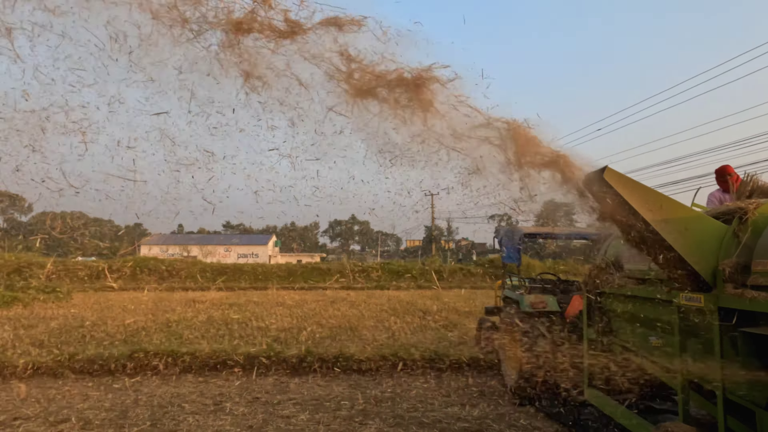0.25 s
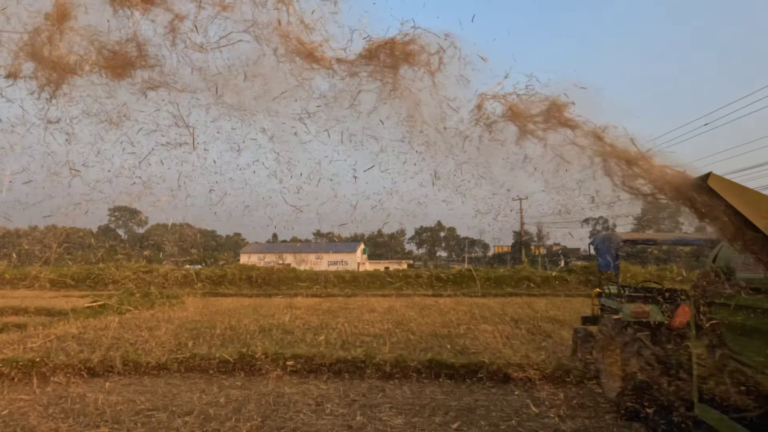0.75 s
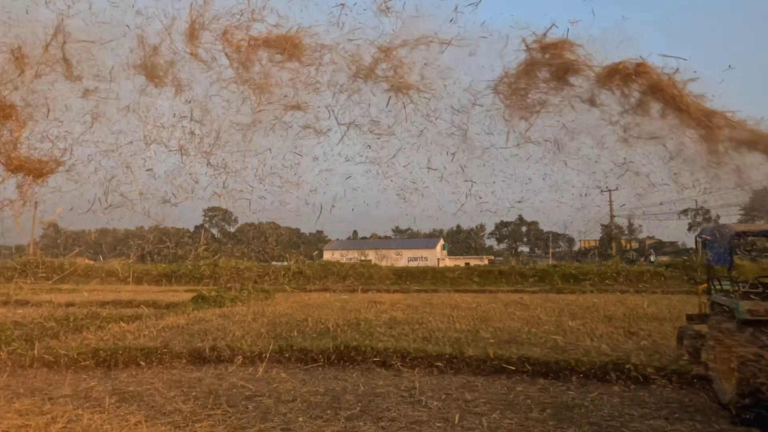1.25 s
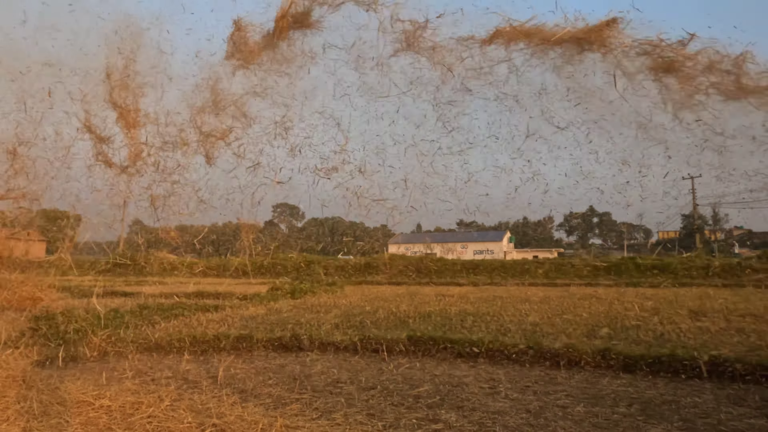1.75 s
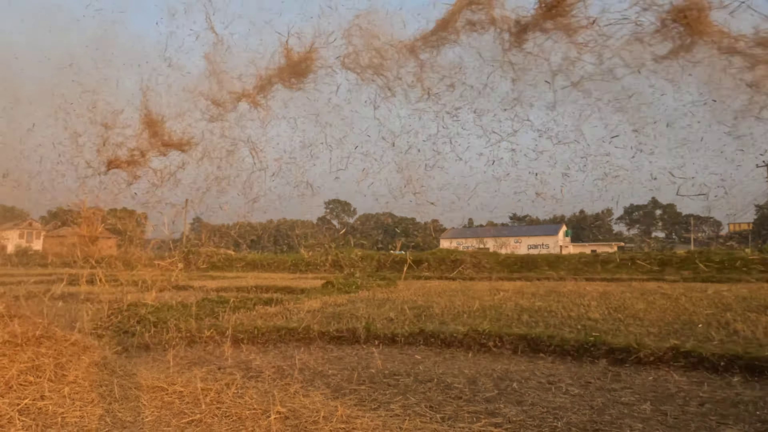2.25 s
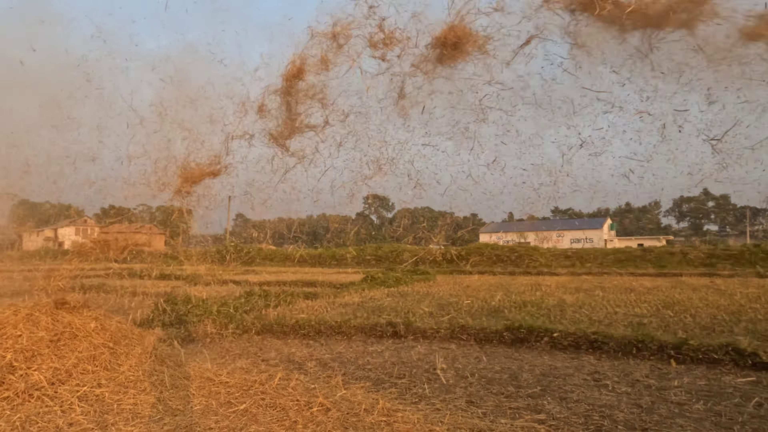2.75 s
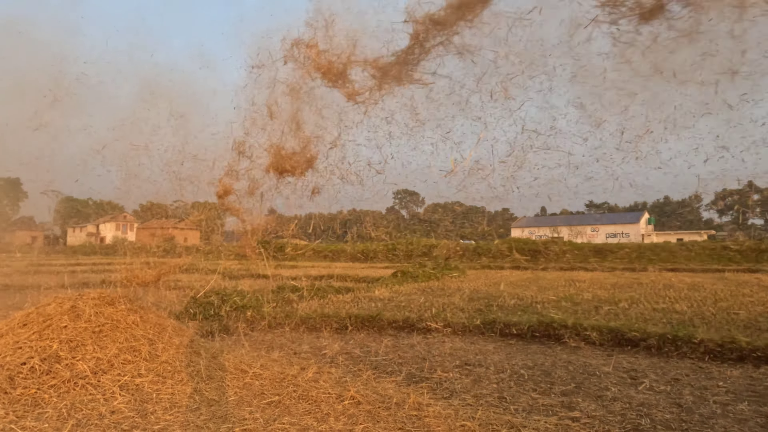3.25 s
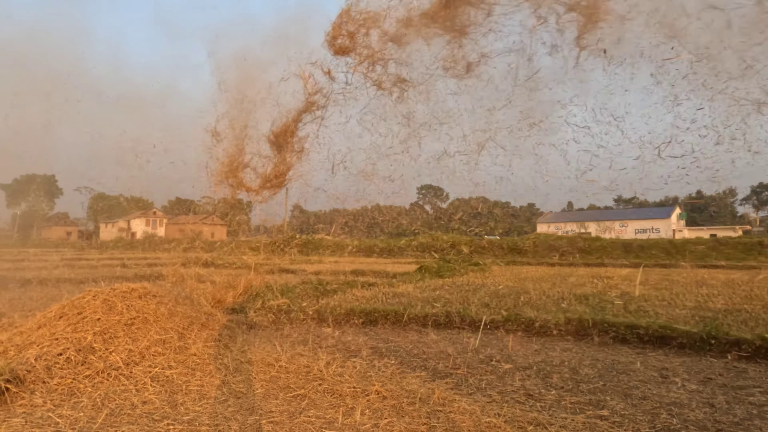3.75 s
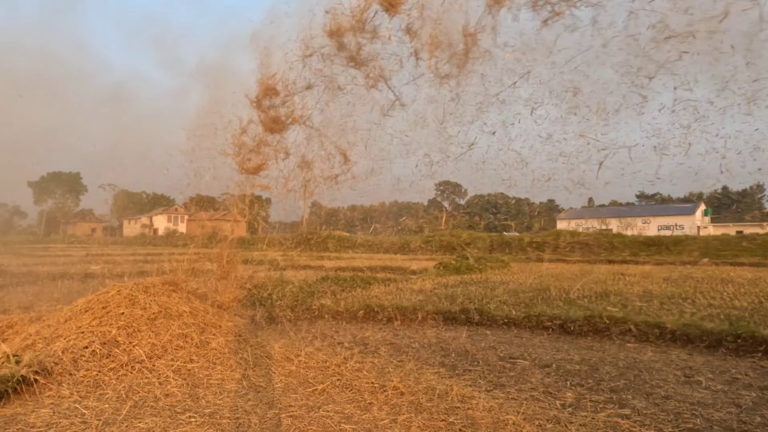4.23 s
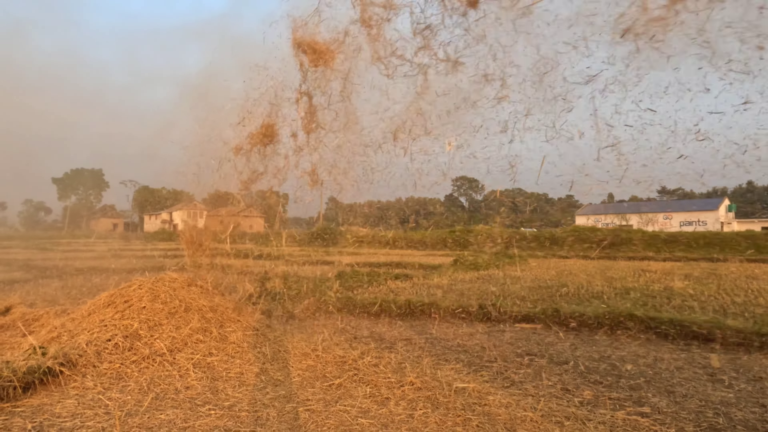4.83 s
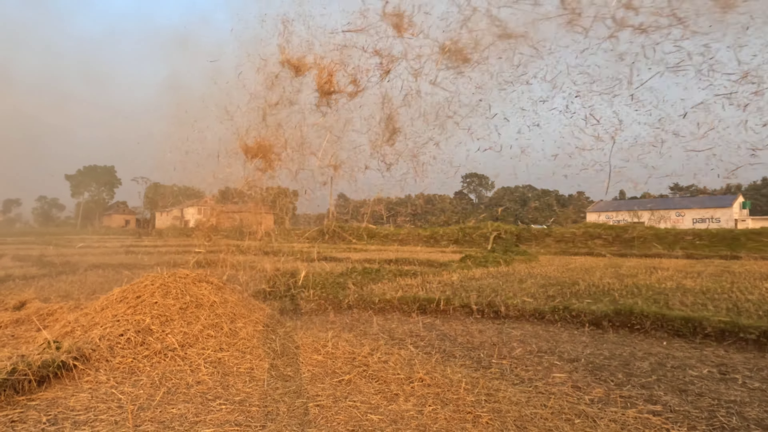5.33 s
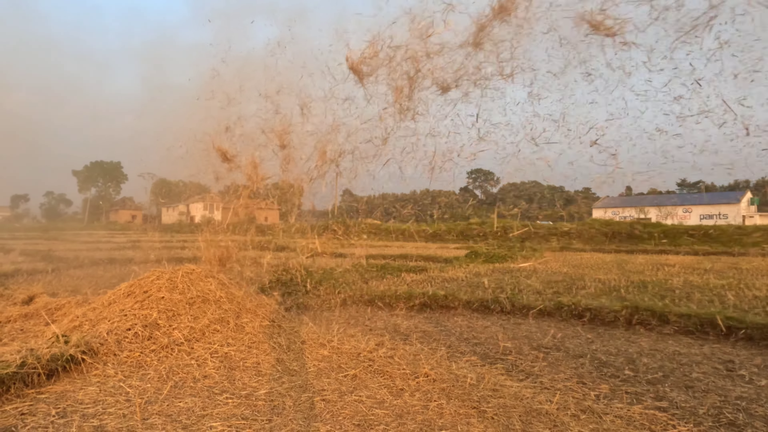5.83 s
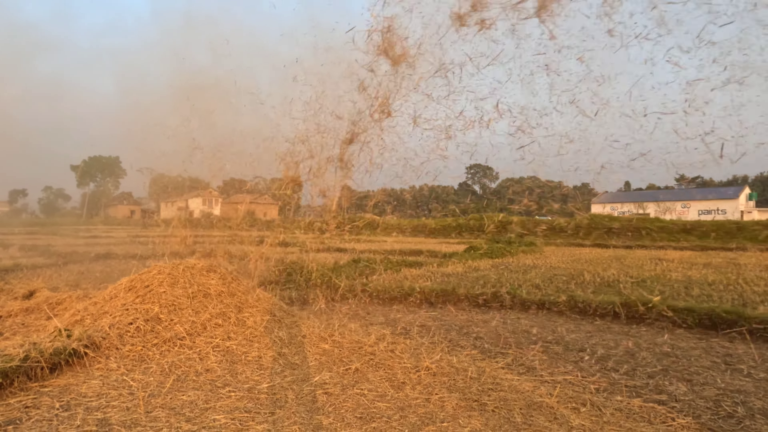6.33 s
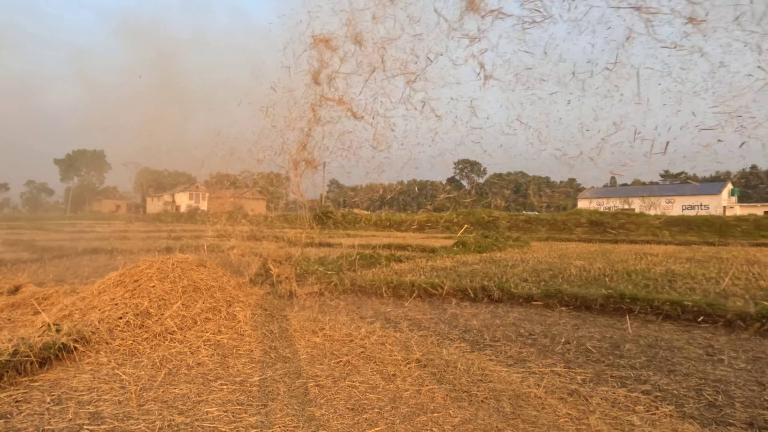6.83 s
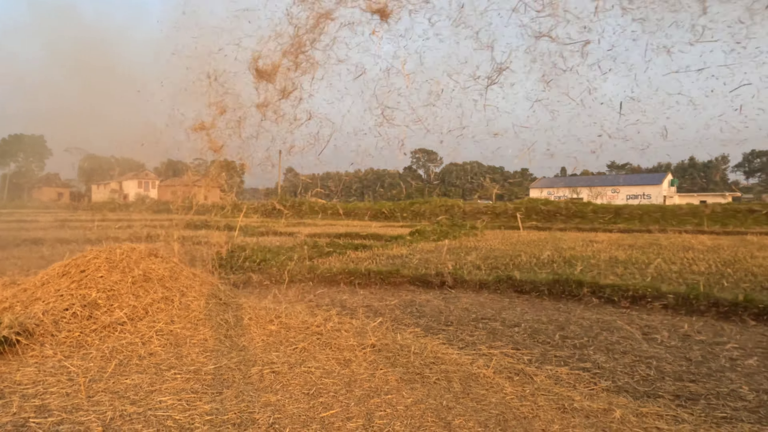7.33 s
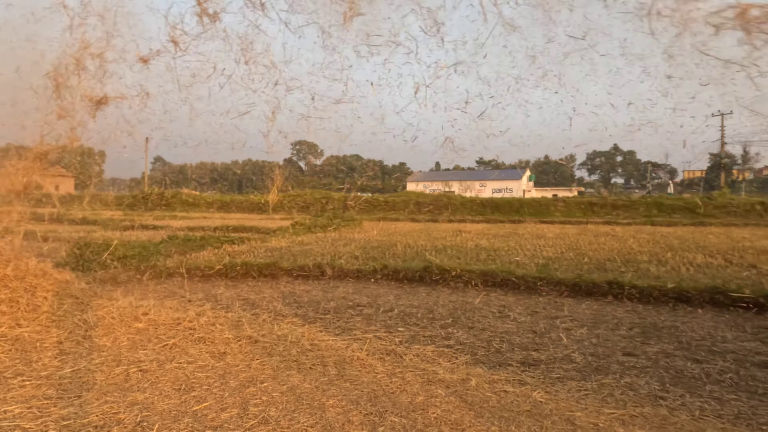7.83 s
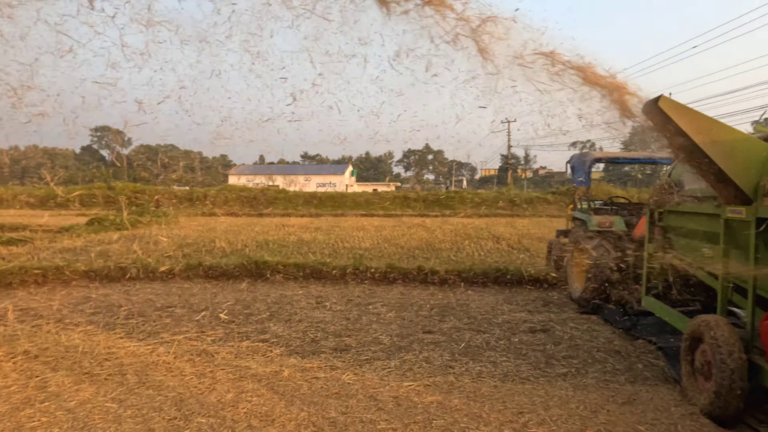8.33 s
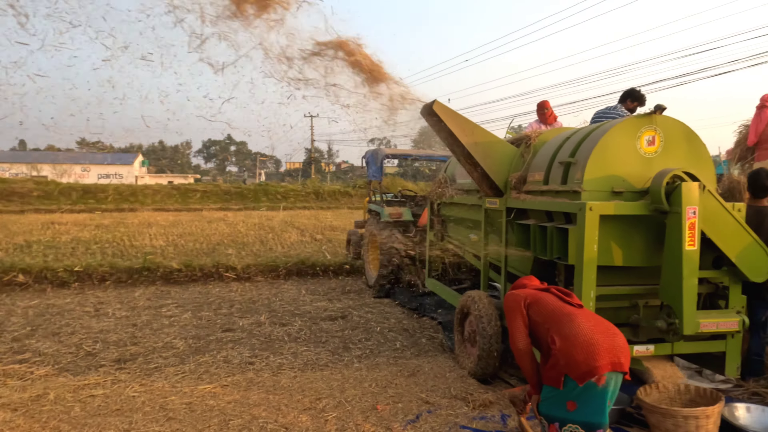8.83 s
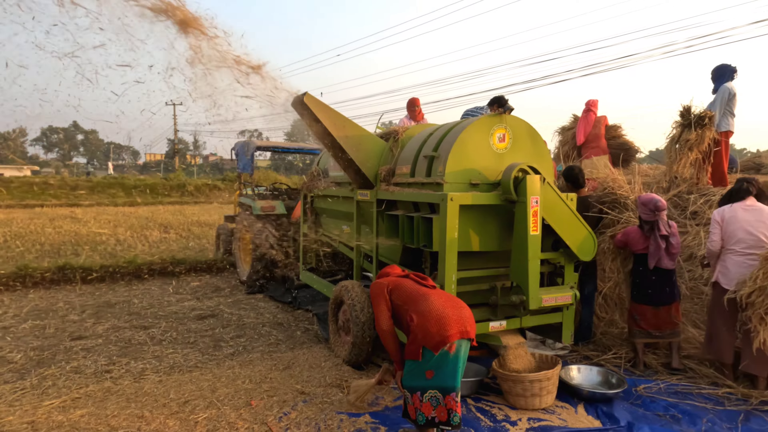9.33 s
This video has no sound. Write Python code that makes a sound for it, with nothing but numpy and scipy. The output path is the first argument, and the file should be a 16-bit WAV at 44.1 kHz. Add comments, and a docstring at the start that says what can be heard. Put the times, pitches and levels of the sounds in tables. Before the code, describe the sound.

Continuous deep fluttering drone of a threshing machine with rushing air, straw hiss and fine metallic rattle; one tiny rising squeak near four seconds.

```python
"""A paddy thresher driven by a tractor, heard from a few metres in an open field. Throughout, the four-blade blower
throbs as locked cosines, the geared engine fires slightly slower, shaped noise makes the housing roar and straw hiss,
and struck modes make the sheet metal rattle. A two-port microphone starts with the machine beside it and turns away
by 2.2 s; a short metal squeak glides up at 3.8 s; from 7.7 s the ports turn back and end up facing the machine."""
import sys
import numpy as np
from scipy import signal
from scipy.fft import rfft, irfft, next_fast_len
from scipy.io import wavfile
from scipy.ndimage import uniform_filter1d, map_coordinates

SR = 44100
rng = np.random.default_rng(int(sys.argv[2]) if len(sys.argv) > 2 else 0)


def output_pcm(signal):
    """Save a mono or channel-first signal as 16-bit PCM at the path in sys.argv[1].

    Samples are clipped to [-1, 1] before scaling.
    """
    pcm = np.clip(np.atleast_2d(signal).T, -1, 1) * 32767
    wavfile.write(sys.argv[1], SR, np.round(pcm).astype(np.int16))


N = 422037  # samples

# All source levels below are ahead of the port response.
# Blower speed. Each row: time in seconds, blade passes in Hz.
BLOWER_SPEED = [(0, 39.08), (.8, 38.99), (1.45, 38.53), (1.9, 38.57), (2.5, 38.79), (3.0, 39.15),
                (4.4, 39.72), (5.0, 39.74), (5.35, 39.42), (5.9, 39.25), (6.6, 39.4), (8.0, 39.95),
                (8.3, 39.87), (8.9, 39.12), (9.57, 39.02)]
# Blower partials; quarters come from unequal blades. Each row: multiple of the blade pass, rms in dB, waver in dB.
BLADE_PARTIALS = [(1, -20, 1.5), (1.25, -50, 5), (1.75, -44, 3), (2, -15, 0.2), (2.499, -52, 2.5),
                  (3, -29, 0.5), (4, -55, 0), (5, -38, 2), (6, -51, 2), (7, -36, 0.5), (8, -47.5, 1),
                  (9, -39, 3), (10, -51, 3)]
# Engine partials. Each row: multiple of the firing rate, rms in dB, waver in dB.
ENGINE_PARTIALS = [(1, -42, 2), (2, -37.5, 1.5), (3, -34.5, 1), (4, -37, .5), (5, -43, .5), (6, -48.5, 1),
                   (8, -47, .5)]
# Airstream. Each row: time in seconds, roar in dB within 300-1500 Hz, straw hiss in dB within 2.5-9 kHz.
AIR_LEVELS = [(0, -26, -34.5), (.3, -27, -36), (1.7, -27.5, -36), (3.3, -27.5, -37.5), (4.0, -27.5, -37.5),
              (4.9, -27, -36.5), (5.9, -28, -36.5), (6.2, -26.5, -37), (6.45, -28, -37.5),
              (7.1, -27.5, -37), (8.15, -28.8, -37), (8.35, -28.5, -36), (8.6, -29, -38), (9.05, -26, -36),
              (9.57, -27.5, -36.3)]
# Clumps of straw leaving the chute. Each row: time in seconds, peak rise of the hiss in dB.
STRAW_CLUMPS = [(.624, 3), (.86, 3), (3.707, 4.5), (4.163, 2.5), (4.51, 4.5), (4.62, 3.5), (4.87, 2.5),
                (5.22, 1.5), (5.692, 1), (6.204, 3), (6.69, 3.5), (7.13, 2.5), (8.19, 0.5)]
# Roar spectrum. Each row: frequency in Hz, relative density in dB.
ROAR_SPECTRUM = [(15, -24), (25, 2), (60, 6.5), (100, 3.5), (150, -1.5), (250, -0.5), (400, 0), (560, -1),
                 (680, -5.5), (1000, -6), (1250, -8.5), (1350, -9), (1480, -16), (2200, -21.5), (4000, -51)]
# Hiss spectrum. Each row: frequency in Hz, relative density in dB.
HISS_SPECTRUM = [(880, -27), (1500, -1.5), (1900, -5), (2350, -7.5), (3180, -8.5), (4180, -11), (5500, -9),
                 (6700, -9.5), (7500, -8.5), (8100, -12.5), (8800, -16), (10100, -23.5), (12200, -21.5),
                 (13600, -33), (15500, -49)]
# Modes of the sheet-metal housing. Each row: frequency in Hz, relative strength in dB, t60 in seconds.
HOUSING_MODES = [(427, 0, 0.058), (549.5, -1, 0.1), (652, -5, 0.051), (786, -1, 0.024), (949, -1, 0.058),
                 (1038, -10.5, 0.097), (1142, -3.5, 0.12), (1240, -2.5, 0.09), (1597, -9, 0.046),
                 (1983, -5.5, 0.049)]
# Timed knocks on the housing. Each row: time in seconds, blow strength in dB ahead of a random draw per mode.
TIMED_KNOCKS = [(.234, -22.5), (.523, -31), (.667, -27), (.958, -31), (4.575, -29), (6.012, -24),
                (6.078, -33), (6.539, -35), (8.76, -35), (8.834, -24), (9.154, -35), (9.254, -27)]
# Turn of the ports. Each row: time in seconds, heading (0 turned away, 1 machine beside, 2 machine ahead).
HEADING = [(0, 1.04), (.85, 0.66), (1.6, 0.15), (2.2, 0.021), (7.7, 0.06), (8.1, 0.67), (8.3, 0.8),
           (8.55, 1), (8.8, 1.7), (9.1, 1.9), (9.57, 2.3)]
# Port pair turned away. Each row: frequency in Hz, left-right likeness 0-1, left over right in dB,
# left phase lead in radians, colour in dB.
PORTS_AWAY = [(80, .9995, 0.04, -0.029, -0.5), (200, .998, -0.6, -0.012, -0.5), (400, 1, 0.2, -0.17, 0),
              (1000, 0.85, -2, -0.31, 0), (2200, 0.93, -1.5, -1.06, 0), (3000, .55, -4.4, -1.66, 0),
              (3800, 0.48, -7.5, -.8, 0), (6000, 0.89, -0.5, 0.22, 0.5), (9000, 0.92, 0, -.03, 0),
              (10500, 0.3, 3.5, .06, 0), (12500, .33, 3, .25, -0.5)]
# Port pair with the machine beside. Each row: frequency in Hz, left-right likeness 0-1, left over right in dB,
# left phase lead in radians, colour in dB.
PORTS_BESIDE = [(80, 0.98, 0, -.02, -0.2), (250, 1, -.6, -.1, 3), (402, 0.94, -1.5, -0.32, -0.5),
                (600, .93, -3.5, -0.43, 0.5), (1000, .94, -2.5, -0.27, 3), (2180, 0.61, -4, -.83, 0.9),
                (3000, .67, -4.6, -1, 5), (4700, .66, -4.5, -.45, 4.5), (8500, 0.87, -1, .03, 4),
                (10500, .28, 1, .23, 4), (12500, .38, 2, .3, 4)]
# Port pair with the machine ahead. Each row: frequency in Hz, left-right likeness 0-1, left over right in dB,
# left phase lead in radians, colour in dB.
PORTS_AHEAD = [(80, .9995, 0, -0.014, -0.4), (245, .989, -.3, -0.064, -0.5), (400, 0.91, -3, -.16, -6.5),
               (600, 0.98, .3, -.05, 1), (1100, 0.87, -0.5, -.28, -2), (2200, 0.96, -0.5, -.27, 3),
               (3800, .82, 1, -.4, 5.5), (6000, 0.71, 1.4, -.55, 3.5), (9000, .9, 0, -.1, 4.5),
               (10500, .6, 3.8, -.06, 6), (13000, .25, 1, 0, 2)]

FIRINGS_PER_PASS = .923
SWELL_DB, SWELLS_PER_S = 0.28, 5  # uneven feeding of sheaves
CLUMP_S = 0.023
SQUEAK_START_S, SQUEAK_LENGTH_S, SQUEAK_PEAK_DB = 3.79, .095, -28
SQUEAK_FROM_HZ, SQUEAK_TO_HZ = 905, 1012
BASS_HZ, TOP_HZ = 40, 15620


def amp(db):
    """Decibels to gain."""
    return 10 ** (np.asarray(db) / 20)


def along(points, hz):
    """Interpolate (Hz, value) points on a log axis."""
    f, v = np.transpose(points)
    return np.interp(np.log(hz + 1), np.log(f + 1), v)


def curves(rows):
    """One value per sample for each column after the time."""
    s, *cols = np.transpose(rows)
    return [np.interp(np.arange(N) / SR, s, c) for c in cols]


def wobble(knots_per_s):
    """Smooth random curve through normal random knots."""
    knots = rng.standard_normal(int(N * knots_per_s / SR) + 4)
    return map_coordinates(knots, [np.arange(N) * knots_per_s / SR])


def filtered(x, response):
    """x times a complex response of frequency; mirrored ends keep the edges free of clicks."""
    edge = 4096  # samples
    x = np.concatenate([x[..., edge:0:-1], x, x[..., :-edge:-1]], axis=-1)
    m = next_fast_len(x.shape[-1])
    spectrum = rfft(x, m) * response(np.fft.rfftfreq(m, 1 / SR))
    return irfft(spectrum, m)[..., edge:edge + N]


def hum(cycles, partials):
    """Pulse train as locked cosines, each wavering a little; upper multiples lag more."""
    lag_cycles = .0015  # per squared multiple
    out = np.zeros(N)
    for k, rms_db, waver_db in partials:
        level = np.sqrt(2) * amp(rms_db + waver_db * wobble(6))
        out += level * np.cos(2 * np.pi * k * (cycles - lag_cycles * k))
    return out


def shafts():
    """Blower and engine share one drive, so their hums sag and recover together; the belt slips a little."""
    pass_hz, = curves(BLOWER_SPEED)
    passes = np.cumsum(pass_hz) / SR - .36  # first pulse about a third of a pass in
    slip_cycles = .03 * wobble(.7)
    firings = FIRINGS_PER_PASS * passes + slip_cycles + 0.2886
    return hum(passes, BLADE_PARTIALS) + hum(firings, ENGINE_PARTIALS)


def rush(spectrum, band_hz, patchy_db):
    """Two unrelated noises with shared patches of random gain, scaled by the first to rms 1 in the band."""
    z = signal.stft(rng.standard_normal((2, N + 1024)), nperseg=512)[2]
    patches = rng.standard_normal(z.shape[1:])
    patches = uniform_filter1d(patches, size=8, axis=0)  # across frequency
    patches = uniform_filter1d(patches, size=10, axis=1)  # across time
    z = z * amp(patchy_db * patches / patches.std())
    pair = signal.istft(z, nperseg=512)[1][:, 512:N + 512]
    pair = filtered(pair, lambda hz: amp(along(spectrum, hz)))
    in_band = filtered(pair[0], lambda hz: (hz > band_hz[0]) & (hz < band_hz[1]))
    return pair / in_band.std()


def airstream():
    """Roar of the housing and hiss of the straw, both fluttering with the uneven feed."""
    t, feed = np.arange(N) / SR, wobble(14)
    roar_db, hiss_db = (db + SWELL_DB * wobble(SWELLS_PER_S) for db in curves(AIR_LEVELS))
    # a clump starts quickly and thins out
    for s, rise_db in STRAW_CLUMPS:
        u = np.clip((t - s) / CLUMP_S + 0.45, 0, None) * 3
        hiss_db = hiss_db + rise_db * u * np.exp(1 - u)
    roar_db = roar_db + .3 * feed + .3 * wobble(30)
    hiss_db = hiss_db + .5 * feed + .4 * wobble(40)
    roar = amp(roar_db) * rush(ROAR_SPECTRUM, (300, 1500), patchy_db=.8)
    hiss = amp(hiss_db) * rush(HISS_SPECTRUM, (2500, 9000), patchy_db=.7)
    return roar + hiss


def rattle(blows_per_s, db, spread_db):
    """Sheaves and grain strike the housing; each blow rings its modes at new strengths."""
    count = int(blows_per_s * N / SR)
    knock_s, knock_db = np.transpose(TIMED_KNOCKS)
    times_s = np.r_[rng.uniform(0, N / SR, count), knock_s]
    blows_db = np.r_[db + spread_db * rng.standard_normal(count), knock_db]
    t, out = np.arange(SR // 10) / SR, np.zeros(N)
    for hz, mode_db, t60_s in HOUSING_MODES:
        strengths = amp(blows_db + mode_db) * rng.standard_normal(len(times_s))
        blows = np.bincount((times_s * SR).astype(int), strengths, N)
        envelope = amp(-60 * t / t60_s) * (1 - np.exp(-t / 0.0021))
        out += signal.fftconvolve(blows, envelope * np.sin(2 * np.pi * hz * t))[:N]
    return out


def squeak():
    """Squeak of metal: one rising partial that swells past its middle and dies."""
    u = np.clip((np.arange(N) / SR - SQUEAK_START_S) / SQUEAK_LENGTH_S, 0, 1)
    hz = SQUEAK_FROM_HZ + (SQUEAK_TO_HZ - SQUEAK_FROM_HZ) * u
    swell = np.sin(np.pi * u ** 1.3)
    return amp(SQUEAK_PEAK_DB) * swell * np.sin(2 * np.pi * np.cumsum(hz) / SR)


def ports(pair, table):
    """Left and right port: a shared and a diffuse part, with the shadow and delay of the body between them."""
    alike, balance, lead, colour = ([(row[0], row[k]) for row in table] for k in range(1, 5))
    sign = np.array([[1], [-1]])  # left, right

    def mix(hz):
        # cos^2 - sin^2 of this angle is the likeness
        angle = np.arccos(np.clip(along(alike, hz), 0, 1)) / 2
        return np.array([np.cos(angle), np.sin(angle)])

    def body(hz):
        gain_db = along(colour, hz) + sign * along(balance, hz) / 2
        return amp(gain_db) * np.exp(.5j * sign * along(lead, hz))

    shared, diffuse = filtered(pair, mix)
    return filtered(shared + sign * diffuse, body)


def scene():
    """The machine as heard while the ports turn: neighbouring headings cross-fade."""
    machine = shafts() + rattle(blows_per_s=140, db=-38, spread_db=2.5) + squeak()
    pair = airstream() + machine * [[1], [0]]  # machine in the shared part only
    heading = np.clip(curves(HEADING)[0], 0, 2)
    out = np.zeros((2, N))
    for k, table in enumerate([PORTS_AWAY, PORTS_BESIDE, PORTS_AHEAD]):
        out += np.clip(1 - abs(heading - k), 0, 1) * ports(pair, table)
    return out


def record(dry):
    """Microphones roll off the deep bass, the input stage rounds the tallest throbs, a band limit cuts the top."""
    x = filtered(dry, lambda hz: 1j * hz / (BASS_HZ + 1j * hz))
    ceiling, hardness = .7, 4
    x = x / (1 + abs(x / ceiling) ** hardness) ** (1 / hardness)
    return filtered(x, lambda hz: hz < TOP_HZ)


dry = scene()
out = record(dry)
output_pcm(out)
```